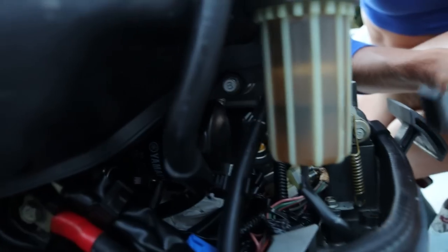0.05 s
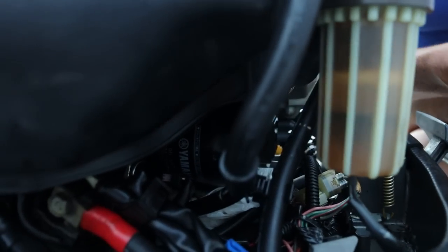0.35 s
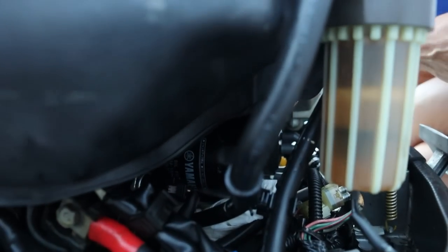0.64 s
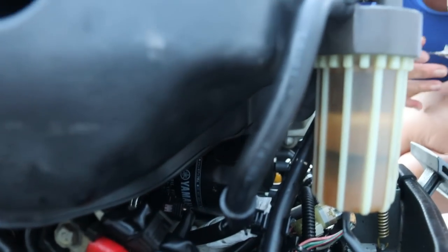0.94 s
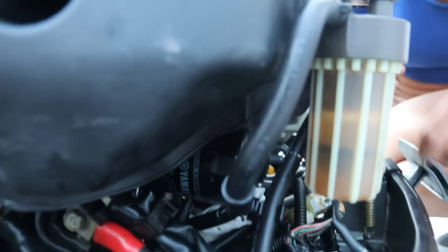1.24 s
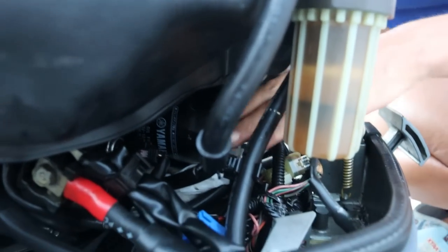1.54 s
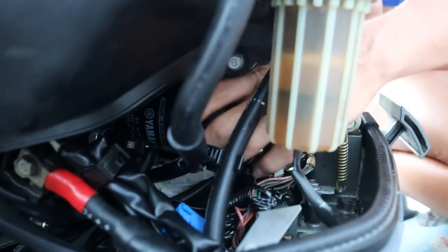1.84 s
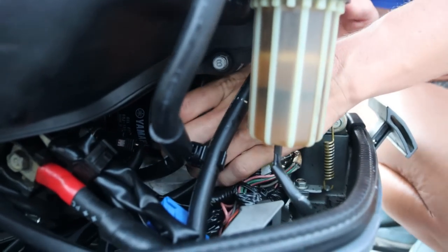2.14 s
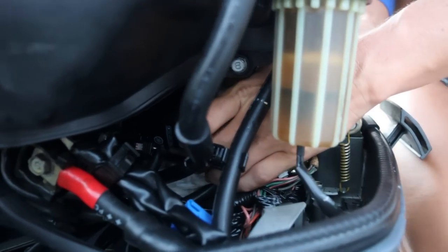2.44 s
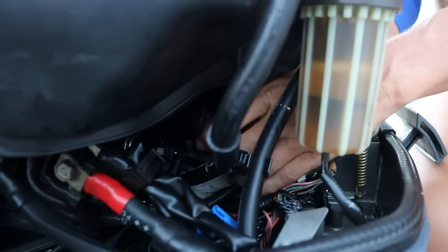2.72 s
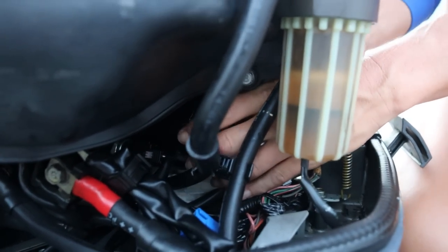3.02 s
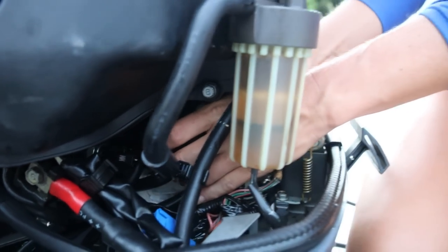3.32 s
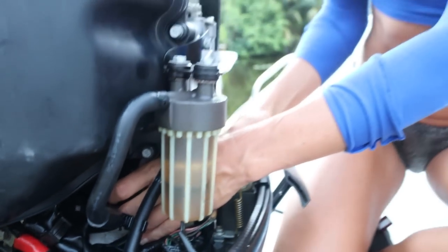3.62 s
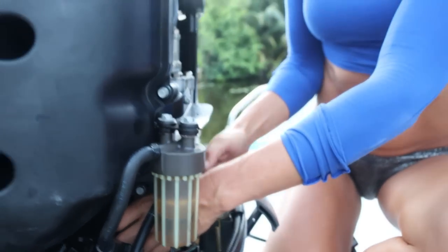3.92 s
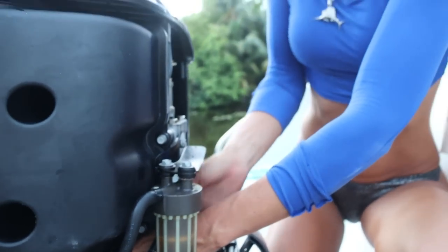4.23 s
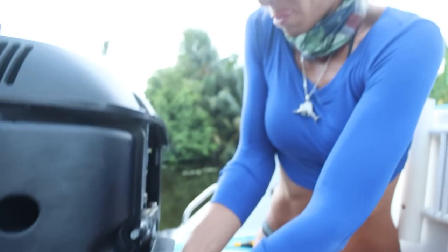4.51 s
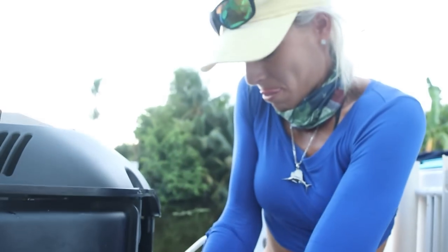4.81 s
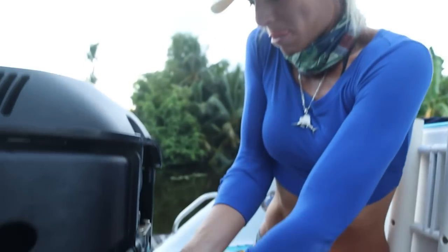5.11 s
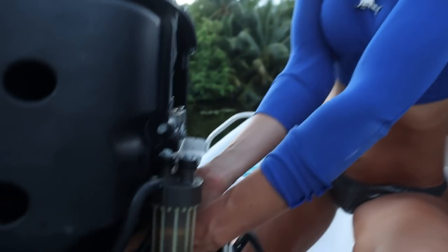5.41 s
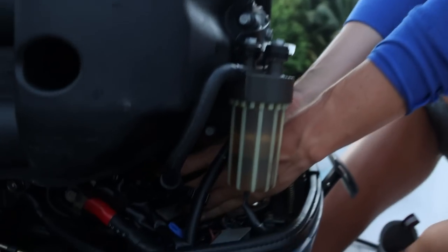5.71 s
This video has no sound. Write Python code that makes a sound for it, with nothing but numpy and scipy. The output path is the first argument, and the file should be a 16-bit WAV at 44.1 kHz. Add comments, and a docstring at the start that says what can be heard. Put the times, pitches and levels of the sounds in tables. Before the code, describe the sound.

A quick burst of sharp metallic knocks on an engine housing, followed by a short rubbery creak and quiet handling outdoors.

```python
"""Hands work a metal oil filter canister loose inside an outboard engine, outdoors.
First a steel tool clinks on the can and knocks the housing: each impact excites damped modes.
From about 1 s arms rub the hoses. At 2 s the can judders by stick-slip on its seal; a thin whistle
sinks and a squeak follows. Fainter twists come after 3 s, then finger flicks, light knocks and soft
thumps of the hull. The engine bay adds a short reverberation, and a quiet rumble lies under it all."""
import numpy as np
from scipy import signal
from scipy.fft import rfft, irfft, next_fast_len
from scipy.ndimage import map_coordinates
import sys
import numpy as np
from scipy import signal
from scipy.fft import rfft, irfft, next_fast_len
from scipy.io import wavfile
from scipy.ndimage import map_coordinates

SR = 44100
rng = np.random.default_rng(int(sys.argv[2]) if len(sys.argv) > 2 else 0)


def transcribe(u):
    """Save the signal u as a 16-bit wav file named by the first command-line argument.

    u: samples, shape (n,) or (channels, n), limited to [-1, 1]; the rate is SR.
    q: integer samples, one column per channel.
    """
    v = np.clip(np.atleast_2d(u).T, -1, 1)
    q = np.round(v * 32767).astype(np.int16)
    wavfile.write(sys.argv[1], SR, q)


N = 258280

# blows on the housing: start_s, level_db, thud_relative_db, hardness_db, favoured_hz
BLOWS = [(0.155, -59.5, 1.5, 1, 312), (0.221, -46.5, 5.5, 10, 457), (0.287, -57, -9, 1.5, 363),
         (0.338, -62.5, 4, 0.5, 832), (0.488, -60.5, 4, 14.5, 296.7), (0.57, -35, 0, -3, 317),
         (0.596, -28.5, -6, -7, 900), (0.636, -17, -5.5, 0, 470), (0.707, -16, -11.5, -5.5, 585),
         (0.735, -21.5, -7.5, -9, 590), (0.751, -33, 3, -10, 626), (0.852, -33.5, 1.5, 14, 1050),
         (0.859, -20, -2, 3, 590), (0.871, -21.5, -9, 1, 1210), (0.97, -31, -6.5, -1.5, 677),
         (1.0319, -12, -5.5, 0, 488.1), (1.04, -17.5, -3.5, -5, 522.2), (1.071, -26.5, -0.5, 3.5, 805),
         (1.084, -34, -5.5, 5, 521.3), (1.229, -55.5, 2, 7, 350), (1.266, -54, -1.5, -3, 354),
         (2.042, -37, -4, -9.5, 520), (2.707, -63, 5, -2, 367), (2.754, -57, -2, -6, 528),
         (3.912, -61, 2.5, 1, 375), (4.715, -46, -1.5, 0, 916), (4.728, -47, 1.5, 1, 835),
         (4.754, -34, -10, 5, 1130), (4.833, -53.5, 6.5, 1, 304), (4.863, -46, -8, 0.5, 871),
         (5.417, -49, -10, -5.5, 800), (5.47, -49.5, -3.5, -5, 702)]
# modes of the housing, before each blow scales their decay: pitch_hz, level_db, t60_s
HOUSING_MODES = [(131, -13.5, 0.11), (240.7, -5, 0.12), (335.4, -6, .14), (373.3, -9, .1),
                 (524, 2.5, 0.084), (557, -0.5, 0.1), (627, 0.5, 0.1), (706.5, -8.5, 0.11),
                 (782, -11.5, 0.2), (849, -4.5, 0.17), (938, -8, 0.096), (1046, -8.5, .08),
                 (1143, -10, 0.11), (1330, -2.5, 0.059), (1444, -11, .08), (1630, -16.5, 0.08),
                 (1735, -13.5, 0.065), (2155, -19, 0.081), (2409, -17, 0.064), (2800, -15.5, 0.0083),
                 (2996, -17.5, .07)]
# spectrum of small parts clattering: frequency_hz, density_db
CLATTER_SPECTRUM = [(88, -42), (150, -10.5), (182, -14), (337, -2), (426, -9.5), (502, -4.5), (609, -0.5),
                    (748, -7.5), (871, 2), (985, -11.5), (1370, -11.5), (1490, -14), (2160, -15.5),
                    (3680, -28.5), (4000, -30), (5200, -58), (8800, -120)]
# steel touching steel: start_s, level_db, sizzle_relative_db
TOUCHES = [(0.019, -67, -9), (0.157, -70, 1.5), (0.2183, -47.5, 8.5), (0.2231, -34, -1.5),
           (0.2406, -59.5, 15.5), (0.279, -55.5, 0.5), (0.3187, -59.5, -0.5), (0.373, -66, -7),
           (0.4893, -45, 3), (0.569, -50, 4), (0.5818, -42, 2), (0.6056, -45, -0.5), (0.6381, -33, -3),
           (0.7057, -40.5, -7.5), (0.7232, -46, 4), (0.7982, -63, -3), (0.854, -33.5, 1), (0.8605, -33, 3),
           (0.871, -30, 2), (0.8844, -32, 0), (0.9054, -47, -3), (0.946, -51, 1.5), (0.951, -52, 6),
           (0.9752, -44.5, -1.5), (0.9883, -47.5, -0.5), (1.033, -31, -3), (1.0443, -39, 2),
           (1.0694, -43.5, -4.5), (1.0954, -48.5, -12.5), (1.1424, -50.5, -7), (1.263, -69, 2),
           (1.7833, -62.5, 11), (1.8427, -69, 2), (2.423, -60, -6), (4.7536, -59.5, -13), (5.452, -69.5, 5)]
# modes of the steel tool, damped by the hand: pitch_hz, level_db
TOOL_MODES = [(4260, 2), (4480, -2.5), (4750, -5), (5140, -7), (6150, -8.5), (11000, -4.5), (11750, -3),
              (12650, 0), (13200, -6.5)]
# spectrum of a clink's bright crash: frequency_hz, density_db
CRASH_SPECTRUM = [(1760, -30), (3000, -2.5), (3260, -2.5), (3550, -11), (4320, -0.5), (4540, -4),
                  (5800, -4.5), (6350, -7.5), (7400, -14.5), (8520, -13), (10700, -7), (12800, -6),
                  (16000, -17)]
# twists of the can: start_s, length_s, friction_db
TWISTS = [(2.002, .04, -40.5), (2.041, 0.061, -37.5), (3.278, 0.19, -58.5), (3.434, 0.25, -60.5)]
# spectrum of the can slipping on its seal: frequency_hz, density_db
JUDDER_SPECTRUM = [(59, -43), (100, -28.5), (250, 2.5), (511, -4.5), (751, -11), (839, -1.5), (1010, -26),
                   (1150, -8.5), (1280, -20), (1620, -19.5), (8000, -54), (10400, -84), (17600, -120)]
# soft bumps of the hull: start_s, relative_level_db
HULL_BUMPS = [(0.643, -20.5), (1.107, -37.5), (4.838, -36), (5.537, -38), (5.565, -35.5), (5.673, -38)]
# squeaks of rubber and skin: centre_s, pitch_hz, level_db, half_length_s, waver_share
RUBBER_SQUEAKS = [(0.01, 1520, -62.5, 0.14, 0.11), (2.426, 2294, -45, 0.0047, 0.019),
                  (4.341, 1090, -70, 0.14, .012), (4.35, 4280, -80.5, 0.059, .008),
                  (4.585, 1337, -65.5, 0.041, .03), (5.125, 1140, -70.5, 0.12, .03)]
# fingers flicking hoses and wires: start_s, level_db
FLICKS = [(2.386, -57), (3.455, -60), (3.852, -61), (4.088, -61), (4.1125, -57.5), (4.151, -57),
          (4.199, -57), (4.935, -55.5), (4.973, -54), (5.023, -56), (5.269, -59)]
# spectrum of a flick: frequency_hz, density_db
FLICK_SPECTRUM = [(200, -14), (700, -1), (1700, 0), (4000, -10), (7000, -20.5), (14000, -16)]
# strokes of arm and sleeve over the hoses: start_s, length_s, rustle_db, hiss_db
ARM_STROKES = [(1.212, .56, -70.5, -68.5), (1.608, 0.61, -63.5, -80), (2.02, 0.22, -66, -72),
               (2.361, 0.11, -59, -72), (2.47, .2, -68.5, -74.5), (2.686, 0.076, -59, -69),
               (3.334, .1, -66, -79), (3.408, 0.3, -63.5, -73.5), (4.502, 0.18, -64.5, -76.5),
               (4.844, 0.22, -68.5, -74.5), (5.1, .12, -69, -82), (5.41, 0.27, -65, -83.5),
               (5.721, 0.12, -68.5, -74.5)]
# spectrum of the rustle of skin and sleeve: frequency_hz, density_db
RUSTLE_SPECTRUM = [(90, -23), (200, -0.5), (500, -1), (1200, -4), (2500, -8.5), (4500, -20.5), (8000, -27),
                   (14000, -44.5)]
# spectrum of the hiss above it: frequency_hz, density_db
HISS_SPECTRUM = [(2350, -63), (4000, -16), (4840, -10), (6400, -11.5), (10100, 0.5), (13500, -4),
                 (15100, -9.5), (16000, -3)]
# reverberation time of the engine bay: frequency_hz, t60_s
BAY_DECAY = [(100, 0.51), (500, 0.26), (1500, 0.16), (4500, .15), (9000, .08), (14000, .07)]
# spectrum of the outdoor background: frequency_hz, density_db
AIR_SPECTRUM = [(20, -27.5), (45, -10), (80, -3), (120, -0.5), (200, -14), (500, -14.5), (750, -17.5),
                (1500, -25), (3000, -32), (6000, -39.5), (16000, -42)]


def housing_knocks():
    """Impact excitation: blows ring the housing and rattle small parts; hard ones are brighter."""
    out, t = np.zeros(N), np.arange(SR // 3) / SR
    for start, db, thud_db, hardness_db, favoured_hz in BLOWS:
        age = t / (.7 * np.exp(-.025 * hardness_db))  # hard contacts die sooner
        clatter = noise(CLATTER_SPECTRUM, len(t)) * fade(age, .067) * rise(t, .001)
        modes = ring(HOUSING_MODES, age, scatter_db=2, favoured_hz=favoured_hz) * rise(t, .0028)
        blow = modes + amp(-5.5) * clatter
        # a spot tuned near 1440 Hz adds to the clack
        spot_db = 5.5 * np.exp(-(np.log(favoured_hz / 1440) / .49) ** 2)
        thud = amp(thud_db) * band(blow, [50, 400])
        body = band(blow, [400, 1000])
        clack = amp(-5.5 + .55 * hardness_db + spot_db) * band(blow, [1100, 2200])
        edge = amp(-11.5 + hardness_db) * band(blow, [2200, 3900])
        add(out, start, amp(db) * (thud + body + clack + edge))
    return out


def tool_clinks(t60_s=.07):
    """Contact chatter of steel on steel excites a bright crash, the tool's modes and two pings."""
    out, t = np.zeros(N), np.arange(SR // 6) / SR
    tool_modes = [(hz, db, t60_s) for hz, db in TOOL_MODES]
    for start, db, sizzle_db in TOUCHES:
        # the pings depend on the spot touched
        low_hz = 4280 * np.exp(.04 * rng.standard_normal())
        high_hz = 11800 * np.exp(.09 * rng.standard_normal())
        burst = noise(CRASH_SPECTRUM, len(t)) * fade(t, .032)
        crash = rough_contact(burst, dwell_s=.0016)
        pings = amp(-9.5) * ring([(low_hz, 0, t60_s), (high_hz, 0, t60_s / 2)], t, scatter_db=.5)
        tool = amp(-5.5) * ring(tool_modes, t, scatter_db=3)
        touch = crash + (pings + tool) * rise(t, .0025)
        sizzle = amp(sizzle_db) * band(touch, 7500, "highpass")
        clink = amp(db) * (band(touch, [3600, 7500]) + sizzle)
        add(out, start, clink)
        add(out, start + rng.uniform(.012, .04), amp(-24.5) * clink)  # loose parts settle
    return out


def canister_judder(sag_db=4.5):
    """Stick-slip on the rubber seal: each twist catches, weakens as the wrist runs out, and stops."""
    friction, t = np.zeros(N), np.arange(N) / SR
    for start, length, db in TWISTS:
        progress = np.clip((t - start) / length, 0, 1)
        friction += amp(db - sag_db * progress) * gesture(start, length, attack_s=.0087, release_s=.026)
    return friction * coloured(slips(per_second=740, spread_db=1.5), JUDDER_SPECTRUM)


def hull_bumps():
    """Free vibration: shifting weight thumps the hull, and its low modes die away."""
    out, t = np.zeros(N), np.arange(SR // 4) / SR
    modes = [(81.6, 2.5, .12), (123, 5, .16), (150, -5.5, .12)]  # pitch_hz, level_db, t60_s
    for start, db in HULL_BUMPS:
        add(out, start, amp(db - 3) * ring(modes, t, scatter_db=8.5) * rise(t, .00082))
    return out


def squeaks():
    """Frictional oscillation of rubber and skin: an unsteady tone with a weak second harmonic."""
    out, t = np.zeros(N), np.arange(N) / SR
    for centre, hz, db, half_length, waver in RUBBER_SQUEAKS:
        phase = 2 * np.pi * np.cumsum(hz * (1 + waver * wobble(900))) / SR
        swell = np.exp(-((t - centre) / half_length) ** 2)
        out += amp(db) * swell * (np.sin(phase) + amp(-14) * np.sin(2 * phase))
    return out


def finger_flicks():
    """Heavy damping: flicked hoses and wires give a dry burst of noise with no ring."""
    out, t = np.zeros(N), np.arange(SR // 10) / SR
    for start, db in FLICKS:
        add(out, start, amp(db) * noise(FLICK_SPECTRUM, len(t)) * fade(t, .046) * rise(t, .0011))
    return out


def arm_rubbing():
    """Sliding friction of arms and sleeves on hoses: a grainy rustle with a thin hiss above it."""
    resting = (1.15, N / SR, -90, -88.5)  # one long, faint stroke: the arm rests against the hoses
    starts, lengths, rustle_db, hiss_db = np.transpose(ARM_STROKES + [resting])[:, :, None]
    motion = gesture(starts, lengths, attack_s=.015, release_s=.019)
    # overlapping strokes add in power
    rustle_gain = np.linalg.norm(amp(rustle_db) * motion, axis=0)
    hiss_gain = np.linalg.norm(amp(hiss_db) * motion, axis=0)
    grains = unit(slips(per_second=700, spread_db=3)) + .5 * rng.standard_normal(N)
    rustle = coloured(grains, RUSTLE_SPECTRUM) * amp(.92 * wobble(25))
    hiss = noise(HISS_SPECTRUM, N) * amp(1.2 * wobble(15))
    return rustle_gain * rustle + hiss_gain * hiss


def whistle(start_s=2.19, length_s=.9, sink_s=.17):
    """Frequency and amplitude modulation: a very thin tone wavers and flickers as it sinks and fades."""
    height = np.exp(-np.maximum(np.arange(N) / SR - start_s, 0) / sink_s)
    glide_hz = np.interp(height, [0, 1], [9850, 13500])
    pitch_hz = glide_hz * (1 + .035 * wobble(1500) + .02 * wobble(22))
    level_db = np.interp(height, [0, 1], [-87, -73.5]) + 4.5 * wobble(25.06)
    envelope = amp(level_db) * gesture(start_s, length_s, attack_s=.015, release_s=.03)
    return envelope * np.sin(2 * np.pi * np.cumsum(pitch_hz) / SR)


def bay_reverberation(x):
    """Reverberation: the engine bay and deck return a short tail whose treble dies first."""
    hz, t, spectra = signal.stft(rng.standard_normal(SR // 2), SR, nperseg=256)
    tail = signal.istft(spectra * fade(t, along(BAY_DECAY, hz)[:, None]), SR, nperseg=256)[1]
    response = np.pad(tail / np.linalg.norm(tail), (SR // 200, 0))  # arrives 5 ms late
    return signal.fftconvolve(x, response)[:N]


def outdoor_air(level_db=-61):
    """Ambient noise: a quiet, wavering rumble with most of its power at low frequencies."""
    return amp(level_db + .8 * wobble(8.7)) * noise(AIR_SPECTRUM, N)


def ring(modes, age, scatter_db, favoured_hz=None):
    """Modal superposition: damped sines, stronger near the pitch that the struck spot favours."""
    hz, db, t60 = np.transpose(modes)[:, :, None]
    if favoured_hz is not None:
        db = db + 6.5 * np.exp(-(np.log(hz / favoured_hz) / .24) ** 2)
    size = amp(db + scatter_db * rng.standard_normal(hz.shape))
    phase = 2 * np.pi * (hz * np.arange(len(age)) / SR + rng.random(hz.shape))
    return np.sum(size * fade(age, t60) * np.sin(phase), axis=0) / np.linalg.norm(size)


def rough_contact(response, dwell_s, count=24):
    """Convolution: each of a quick train of tiny impacts sets off the same response."""
    size = len(response)
    moments = np.minimum(dwell_s * rng.exponential(size=count) * SR, size - 1).astype(int)
    force = np.bincount(moments, rng.standard_normal(count), size)
    return signal.fftconvolve(response, force / np.linalg.norm(force))[:size]


def slips(per_second, spread_db):
    """Stick-slip: tiny releases at random moments and of random size."""
    releases = rng.random(N) < per_second / SR
    return releases * amp(spread_db * rng.standard_normal(N)) * rng.choice([-1, 1], N)


def gesture(start, length, attack_s, release_s):
    """Envelope of one movement: it builds up, holds and dies away."""
    age = np.maximum(np.arange(N) / SR - start, 0)
    return rise(age, attack_s) * np.exp(-np.maximum(age - length, 0) / release_s)


def rise(t, attack_s):
    """Onset transient: the contact force builds up."""
    return 1 - np.exp(-(t / attack_s) ** 2)


def fade(t, t60):
    """Free decay: 60 dB down after t60."""
    return np.exp(-np.log(1000) * t / t60)


def band(x, edges_hz, kind="bandpass"):
    """Filtering: one band of an impact, at rms 1 over its first 20 ms."""
    y = signal.sosfilt(signal.butter(3, edges_hz, kind, fs=SR, output="sos"), x)
    return y / np.sqrt(np.mean(y[:SR // 50] ** 2))


def coloured(x, spectrum):
    """Spectral shaping: x filtered by a spectrum, at rms 1."""
    size = next_fast_len(len(x) + 8192)
    gain = amp(along(spectrum, np.fft.rfftfreq(size, 1 / SR)))
    return unit(irfft(rfft(x, size) * gain, size)[:len(x)])


def noise(spectrum, size):
    """Coloured noise of rms 1."""
    return coloured(rng.standard_normal(size), spectrum)


def wobble(per_second):
    """Random modulation: a smooth curve through evenly spaced random knots."""
    knots = rng.standard_normal(int(N * per_second / SR) + 4)
    return map_coordinates(knots, [np.arange(N) * per_second / SR])


def along(points, hz):
    """Interpolation on a logarithmic frequency axis."""
    frequencies, values = np.transpose(points)
    return np.interp(np.log(hz + 1), np.log(frequencies + 1), values)


def amp(db):
    """Decibels to amplitude ratio."""
    return 10 ** (np.asarray(db) / 20)


def unit(x):
    """Normalisation to rms 1."""
    return x / np.sqrt(np.mean(x ** 2) + 1e-20)


def add(track, start_s, sound):
    """Superposition: a sound joins the track at start_s."""
    part = track[round(start_s * SR):][:len(sound)]
    part += sound[:len(part)]


def scene():
    """Superposition of the close work, its reverberation and the open air."""
    work = housing_knocks() + tool_clinks() + canister_judder() + finger_flicks() + squeaks() + whistle()
    reverberation = amp(-19.5) * bay_reverberation(work)
    return (work + reverberation + hull_bumps() + arm_rubbing() + outdoor_air())[None]


def record(dry, ceiling=.95, cutoff_hz=15900):
    """Soft saturation rounds the highest peaks; a steep low-pass limits the bandwidth."""
    rounded = dry / (1 + np.abs(dry / ceiling) ** 6) ** (1 / 6)
    return signal.sosfilt(signal.ellip(10, .1, 80, cutoff_hz, fs=SR, output="sos"), rounded)


dry = scene()
out = record(dry)
transcribe(out)
```